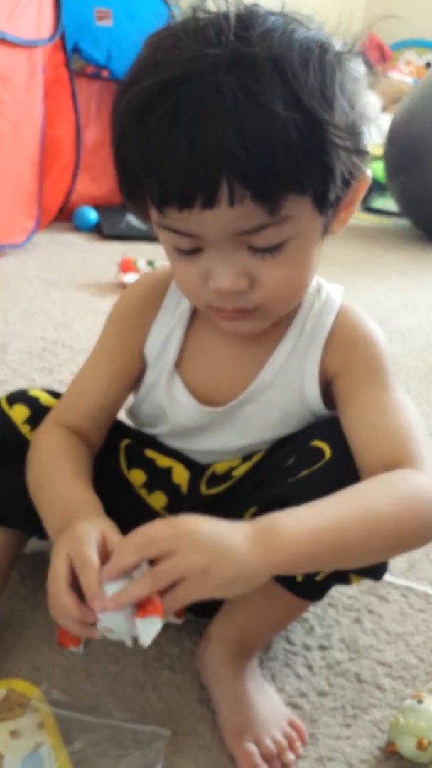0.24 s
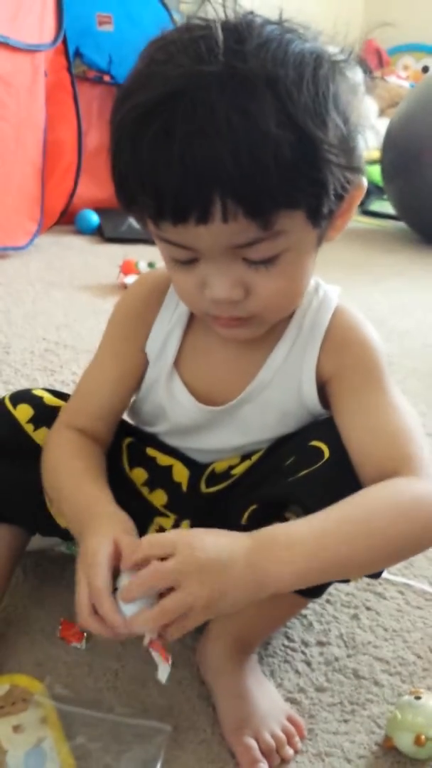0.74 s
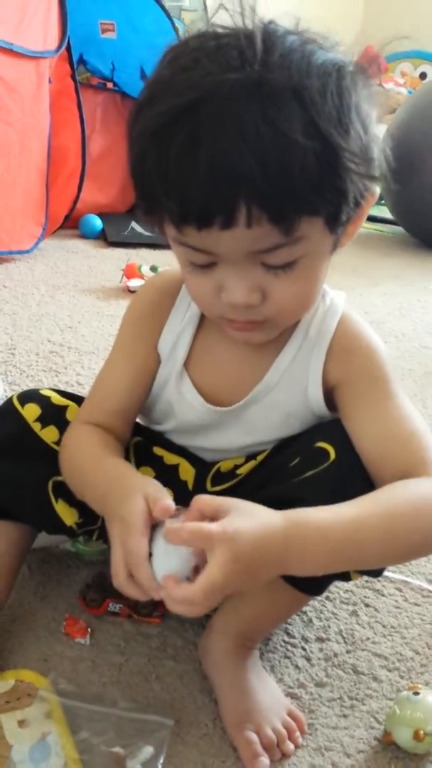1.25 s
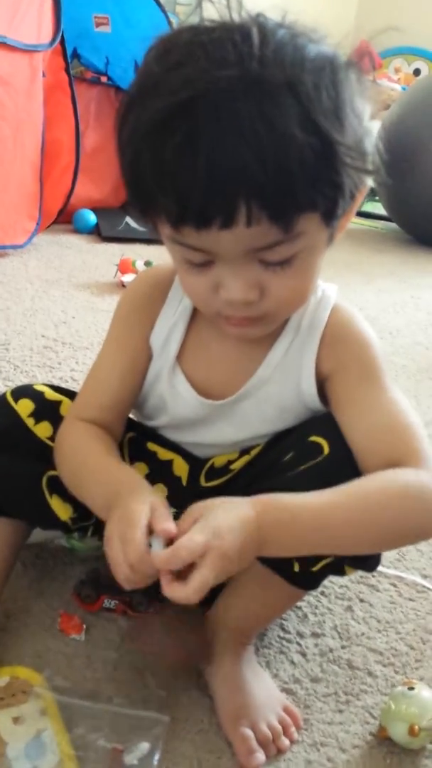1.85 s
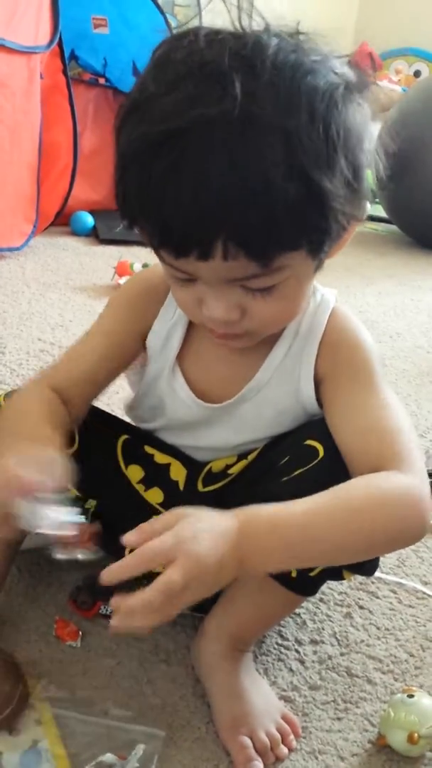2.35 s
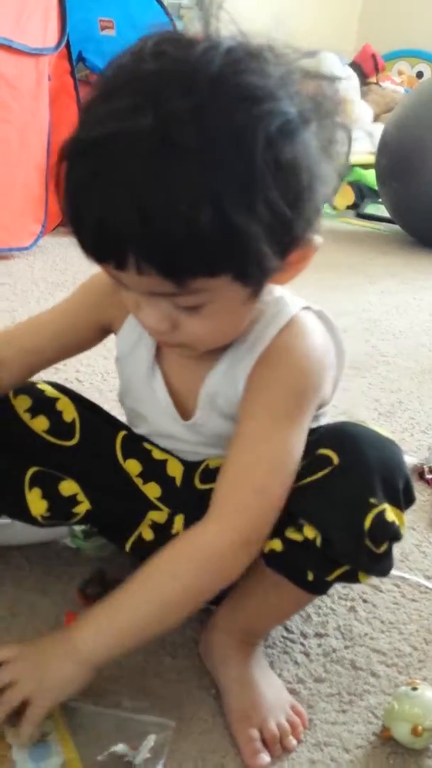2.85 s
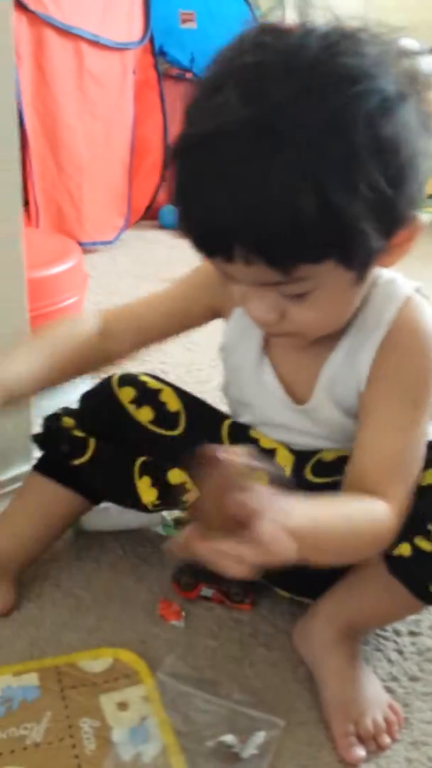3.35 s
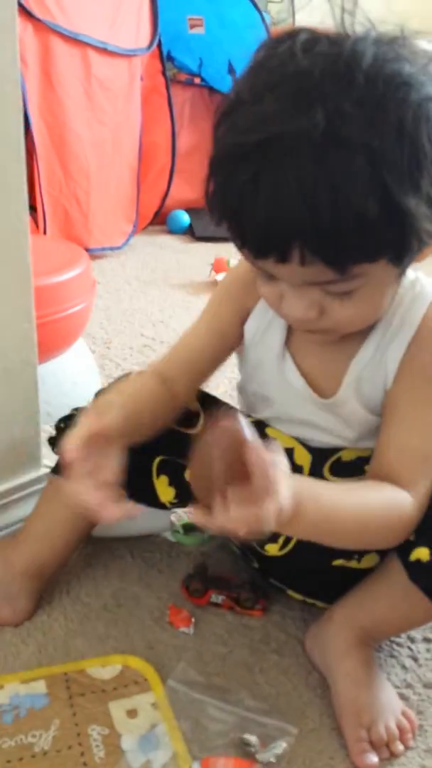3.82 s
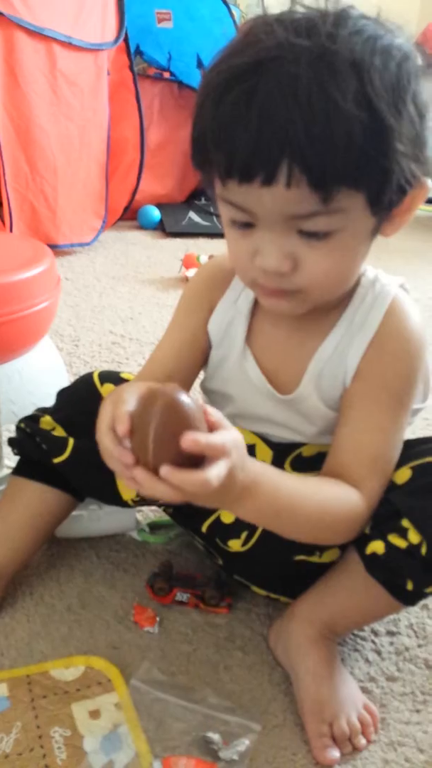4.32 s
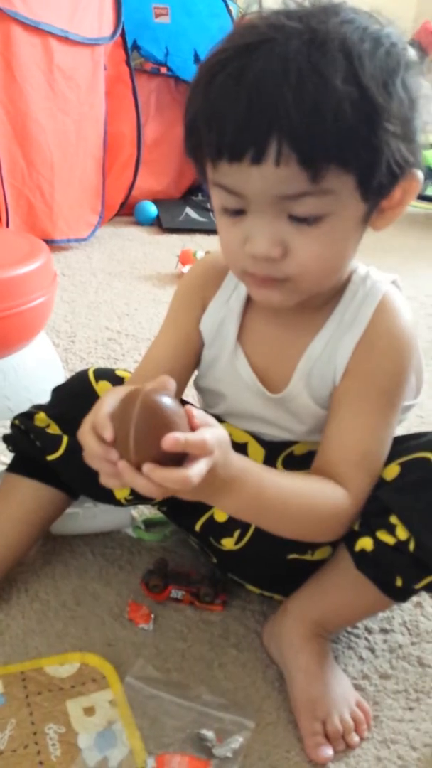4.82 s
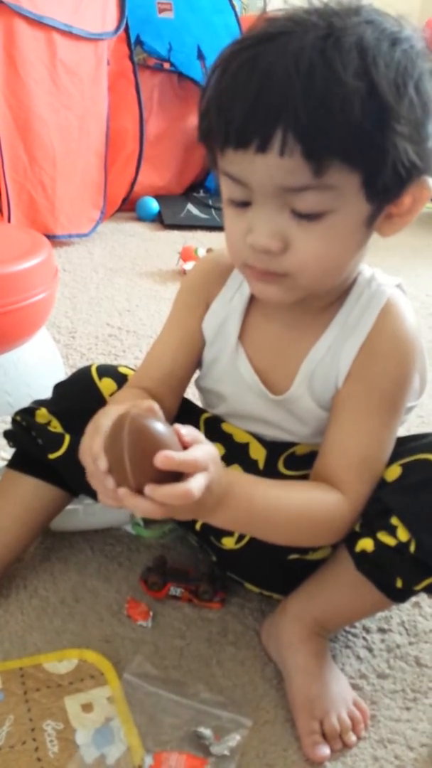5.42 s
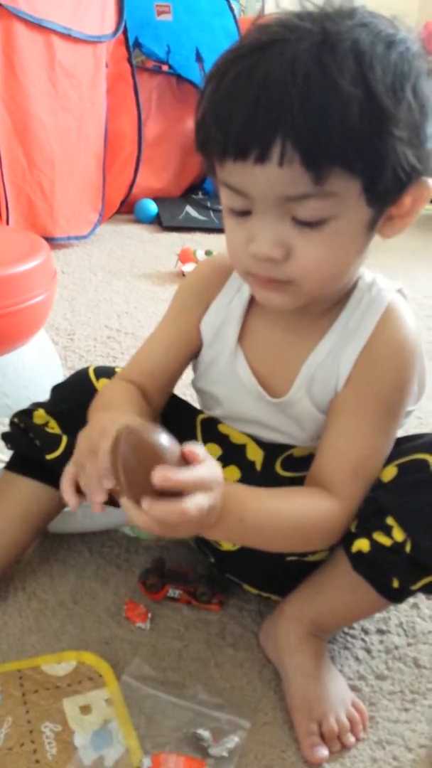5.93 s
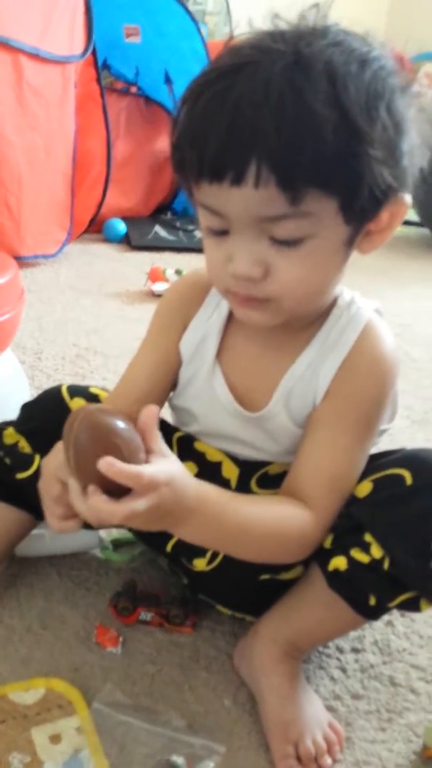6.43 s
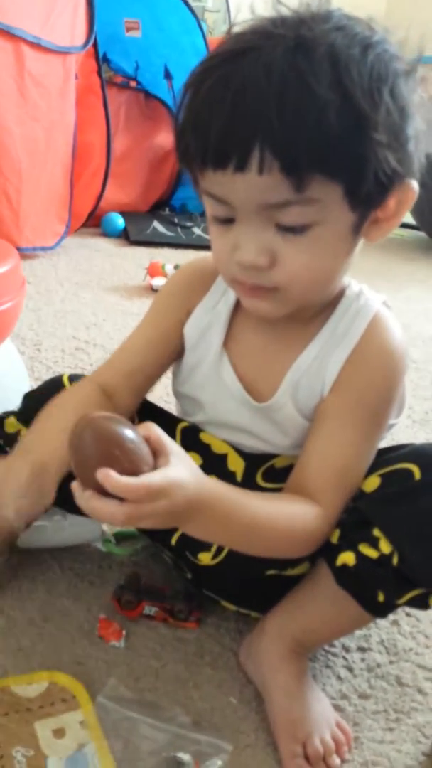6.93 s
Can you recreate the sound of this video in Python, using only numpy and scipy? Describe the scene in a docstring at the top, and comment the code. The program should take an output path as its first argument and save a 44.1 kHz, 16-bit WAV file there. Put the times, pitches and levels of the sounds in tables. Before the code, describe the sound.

Thin foil crinkles and snaps in bright, dense bursts close to the microphone, with soft floor thumps, a near-silent pause, then a few last crackles.

```python
"""In a carpeted room, a thin foil wrapper is crumpled and torn close to a phone.
Its creases snap singly as ticks with dying noise, and rustle in short squeezes as streams of grains;
both drive four bands, of which the top-level ring is the resonance of two microphone ports near 6.7 and 7.5 kHz.
Soft blows excite low modes of the floor, feedback delays form the reverberation,
the phone being handled rumbles as faint low noise and the microphones hiss."""
import sys
import numpy as np
from scipy import signal
from scipy.fft import rfft, irfft, next_fast_len
from scipy.io import wavfile

SR = 44100
rng = np.random.default_rng(int(sys.argv[2]) if len(sys.argv) > 2 else 0)


def unload_audio(sound):
    """Save the sound as a 16-bit wav file, at the path given as the first command line argument."""
    columns = np.transpose(np.atleast_2d(sound))
    # keep every value between -1 and 1, then stretch to whole-number steps
    steps = np.round(np.clip(columns, -1, 1) * 32767)
    wavfile.write(sys.argv[1], SR, steps.astype(np.int16))


N = 316197


def foil(tail_db, tick_db, panel_db, panel_width_hz, patchy_db):
    """Source and filter: snaps (a tick, then an uneven decay) and grainy rustle drive four bands."""
    # creases that snap: t/s, drive level/dB of ring, body, middle and sheen, panel pitch f/Hz
    snaps = [(0.052, -47, -69.5, -78, -65, 1314), (0.154, -46, -62, -71, -61, 730),
             (0.3608, -40, -71, -65, -67, 1290), (0.4538, -39.5, -70, -78, -71, 711),
             (0.699, -34, -80, -71, -61, 960), (0.7757, -29.5, -86, -47, -61, 1470),
             (0.8761, -29.5, -65, -50, -61, 611), (0.9215, -26, -80, -39, -41, 2000),
             (0.9754, -38, -49.5, -50, -49, 850), (0.9874, -24.5, -70, -36.5, -31, 900),
             (1.0413, -31, -49.5, -44, -34, 880), (1.0924, -27, -73, -65, -52, 947),
             (1.1024, -27.5, -76, -62, -58, 891), (1.1939, -20.5, -48, -27.5, -59, 1950),
             (1.281, -20, -74, -41.5, -29, 853), (1.3133, -27, -60.5, -48, -47, 990),
             (1.356, -35, -57, -67.5, -67, 880), (1.4431, -18.5, -62.5, -73.5, -33.5, 921),
             (1.5371, -29, -66.5, -51, -46, 2000), (1.5493, -16, -68.5, -25.5, -53, 2020),
             (1.5827, -24.5, -72, -60.5, -51.5, 2000), (1.614, -22.5, -67, -41.5, -54, 1680),
             (1.6412, -26, -78, -32.5, -46.5, 1730), (1.6715, -11, -48.5, -25.5, -33, 1580),
             (1.6756, -20, -54.5, -26.5, -33.5, 2020), (1.6922, -28, -38, -27, -34, 1690),
             (1.722, -20, -46.5, -23, -37, 1770), (1.8118, -15.5, -45, -58, -29, 1950),
             (1.8882, -13.5, -51, -34.5, -45, 606), (1.9446, -27, -51, -36, -41, 600),
             (1.953, -16, -24.5, -20.5, -53, 610), (1.9893, -22, -54, -30, -45, 1780),
             (2.002, -33, -61, -36, -29.5, 821), (2.0679, -12.5, -37.5, -28, -30, 1414),
             (2.1194, -21, -41.5, -61, -48, 970), (2.131, -24, -56, -55, -44, 1400),
             (2.1788, -32.5, -49, -68, -50, 1890), (2.2611, -24.5, -70.5, -43, -57.5, 748),
             (2.278, -17, -65, -46.5, -41.5, 713), (2.3185, -12, -37, -23, -39.5, 1860),
             (2.3968, -23, -51, -27.5, -41.5, 1800), (2.4176, -24, -42, -34, -17, 1460),
             (2.4261, -16, -77.5, -25.5, -26, 1590), (2.4786, -24, -69, -55.5, -55, 1410),
             (2.4964, -22.5, -54, -36, -51.5, 1150), (2.581, -7.5, -56.5, -16, -42.5, 1680),
             (2.6905, -17, -37, -49, -39, 1160), (2.7306, -33, -44, -51.5, -61, 810),
             (2.8572, -24.5, -42, -25.5, -56, 2030), (2.876, -31, -63, -56, -52, 624),
             (3.2399, -31.5, -52, -50, -83, 740), (3.3317, -35, -61, -55, -53, 980),
             (3.46, -47, -39, -23, -35.5, 1900), (3.5048, -26.5, -57, -54, -38, 1620),
             (3.603, -16.5, -39, -30, -39, 880), (3.608, -8, -36.5, -23, -37, 950),
             (3.62, -27.5, -73, -31, -32, 1840), (3.6466, -21, -60, -52, -43, 947),
             (3.6612, -19.5, -45, -33, -40, 1820), (3.7121, -52, -37.5, -39, -59, 800),
             (3.758, -36, -48, -41, -72, 1420), (3.873, -41.5, -75, -82, -73, 786),
             (3.9382, -24, -45, -37, -56, 790), (4.0335, -51, -63, -64, -67, 778),
             (4.122, -52, -57.5, -61, -81.5, 862), (5.0469, -37.5, -56.5, -50.5, -72.5, 860),
             (5.935, -24, -32.5, -33, -63.5, 1304), (6.182, -49.5, -65, -71, -58, 1910),
             (6.2234, -35, -65, -64, -41, 1310), (6.2357, -31, -56, -41.5, -47, 1790),
             (6.2577, -24.5, -41, -32.5, -56, 1460), (6.2968, -33, -62, -39, -58, 1760),
             (6.3331, -23.5, -50, -37, -47, 1390), (6.3599, -28, -39.5, -29.5, -44, 1060),
             (6.454, -28, -58, -54, -23, 724), (6.4673, -41, -65, -68, -35, 708),
             (6.5294, -28.5, -74, -48, -40, 1980), (6.614, -31.5, -60, -61, -40, 1710),
             (6.6683, -28, -43.5, -39.5, -57, 1430), (6.893, -39, -55.5, -74, -65, 1110),
             (7.042, -12.5, -28.5, -21, -42, 1060), (7.0554, -11.5, -20.5, -12, -32, 1120),
             (7.1024, -46, -25, -52, -49, 650), (7.1538, -26, -26, -30, -40, 895),
             (7.156, -10, -32, -16, -39, 1890)]
    # the foil shifts between the ports: t/s, left minus right of the ring drive/dB
    lean = [(0, 4.5), (1, 4.5), (2, 2.5), (3, 4), (4, 5), (6, 1.5), (7.17, 0)]
    # stereo balance of body, middle, sheen: left minus right/dB
    sides_db = [6.5, 3, -0.5]
    # left-right correlation [-1 to 1] of the noise driving ring, body, middle, sheen
    alike = [0.21, -0.29, -0.28, -0.4]
    snap_t60_s = 0.024

    levels = rustle()
    common = crackle(per_s=440, spread_db=1.5, smooth=1.0)
    t = np.arange(2048) / SR
    wander = signal.lfilter([.3], [1, -.95], rng.standard_normal((len(snaps), len(t))))
    tails = from_db(tail_db + 2.7 * wander)
    tick = from_db(tick_db) * (t == 0)      # the crease lets go in one step
    overtones_hz = rng.uniform(2800, 4400, len(snaps))
    out = np.zeros((2, N))
    for k in range(4):
        own = crackle(per_s=270, spread_db=1.5, smooth=0.11)      # creases of one size sound in one band only
        patches = from_db(patchy_db * drift(5.5))
        grains = rms_one(common + 0.26 * own)
        level = np.pad(levels[k] * patches * grains, (0, len(t)))
        white = pair(rng.standard_normal((2, N + len(t))), alike[k])
        drive = level * white
        for (s, *dbs, panel_hz), tail, overtone_hz in zip(snaps, tails, overtones_hz):
            start = round(s * SR)
            at = slice(start, start + len(t))
            decay = from_db(dbs[k] - 60 * t / snap_t60_s)
            burst = (white[:, at] * tail + tick) * decay
            if k == 1:      # the panel that buckles has a pitch of its own
                burst = burst + from_db(panel_db) * resonance(burst, panel_hz, panel_width_hz)
            if k == 2:      # and a broader overtone somewhere above
                burst = burst + from_db(-1.5) * resonance(burst, overtone_hz, 300)
            drive[:, at] += burst
        balance = sides(in_time(lean)[0]) if k == 0 else sides(sides_db[k - 1])[:, None]
        out += colour(drive[:, :N], size=k) * balance
    return out


def rustle():
    """Exponential envelopes: each squeeze swells and fades straight in dB; powers add to background handling."""
    # squeezes: peak t/s, ring drive level/dB, swell t/s and fade t/s over 20 dB,
    # lower-part level/dB and sheen level/dB relative to the ring
    squeezes = [(0.062, -61.5, 0.044, .15, -6, -9), (0.17, -48, .045, 0.042, -14, -13),
                (0.364, -54.5, 0.19, 0.032, -16.5, -13), (0.594, -60.5, .18, 0.056, -17, -16),
                (0.728, -47, 0.044, 1, -14.5, -16), (0.93, -39.5, 0.026, .2, -22, -15),
                (1.105, -37.5, 0.023, 0.18, -32, -30), (1.292, -44.5, 0.17, 0.11, -12.5, -11.5),
                (1.454, -61, 0.036, .09, -12, 7), (1.684, -17.5, 0.049, 0.096, -15, -16.5),
                (1.821, -32.5, 0.062, 0.14, -9.5, -10), (1.956, -39.5, 0.025, 0.22, -12, -17),
                (2.078, -34.5, 0.021, 0.17, -12, -8.5), (2.275, -43, .025, 0.24, -20, -14),
                (2.327, -31.5, 0.018, 0.055, -9, -3), (2.417, -20.5, 0.044, 0.04, -23, -15),
                (2.46, -40.5, .03, 0.26, -9, -8), (2.654, -25.5, 0.075, .038, -13.5, -24),
                (2.784, -30.5, 0.37, 0.14, -12.5, -16.5), (3.248, -61.5, 0.11, .18, -5, -19),
                (3.342, -43, 0.052, 0.13, -11.5, -11), (3.467, -33.5, 0.045, 0.14, -12.5, -14),
                (3.612, -34, 0.015, 0.12, -7.5, -8.5), (3.759, -39.5, 0.15, 0.056, -13, -13),
                (3.946, -51.5, 0.103, 0.12, -13, -34), (5.049, -66, .025, 0.25, -8.5, -10),
                (5.946, -40, 0.028, 0.12, -8.5, -15.5), (6.176, -64, .035, .4, -11, -11),
                (6.368, -41.5, 0.15, 0.05, -10, -12), (6.465, -51.5, 0.11, 0.21, -12.5, -8),
                (6.538, -55.5, .04, 0.082, -10, -6), (6.622, -54, .08, 0.2, -8.5, -11),
                (6.695, -42, 0.052, .15, -11.5, -14.5), (6.902, -49, 0.12, 1, -15.5, -13.5),
                (7.051, -26.5, 0.0065, 0.092, -8, -21), (7.17, -41, .05, .1, -20, -15)]
    # faint, slowly varying rustle of the foil between squeezes: t/s, ring drive level/dB
    handling = [(0, -65), (0.42, -73.5), (1.0, -61.5), (1.45, -64.5), (2.0, -69), (2.93, -56), (3.2, -70),
                (3.84, -65.5), (4.09, -70), (4.4, -74.5), (4.55, -83.5), (5.0, -83.5), (5.9, -84.5),
                (7.17, -70)]
    # offsets of body and middle within the lower part: level/dB
    lower_colour_db = [-8.5, 1]
    handling_lower_db, handling_sheen_db = -6.5, -7   # relative to the ring, before the offsets

    t = np.arange(0, N + 64, 64) / SR
    s, db, swell, fade, lower, sheen = (c[:, None] for c in np.transpose(squeezes))
    before = (s - t) / np.maximum(swell, .005)
    after = (t - s) / np.maximum(fade, .005)
    shape_db = db - 20 * np.maximum(before, after)
    handling_db = np.interp(t, *np.transpose(handling))
    body, middle = lower_colour_db
    # each band relative to the ring: (in squeezes, in background handling)
    shares = [(0, 0),
              (lower + body, handling_lower_db + body),
              (lower + middle, handling_lower_db + middle),
              (sheen, handling_sheen_db)]
    powers = [np.sum(from_db(shape_db + a) ** 2, axis=0) + from_db(handling_db + b) ** 2 for a, b in shares]
    return [np.interp(np.arange(N) / SR, t, np.sqrt(p)) for p in powers]


def crackle(per_s, spread_db, smooth):
    """Shot noise: clumped small creases of uneven size, each a pulse of a millisecond or two, on a smooth bed."""
    born = rng.random(N) < per_s * from_db(6.0 * drift(25)) / SR
    sizes = born * from_db(spread_db * np.minimum(rng.exponential(1, N), 3))
    decayed = signal.lfilter([1], [1, -.97], sizes)
    swell = signal.lfilter([1], [1, -.9], decayed)      # rounds the onset
    return rms_one(rms_one(swell) + smooth)


def colour(x, size):
    """Linear filtering: size 0 is the port resonance, 1 to 3 are body, middle, sheen; scaled by impulse energy."""
    # resonance of the left and right microphone port: f/Hz, width of one pass f/Hz, level/dB
    ports = [(6663, 1550, 0.5), (7520, 2500, -4)]
    # band edges of body, middle, sheen: lower f/Hz, upper f/Hz
    bands = [(600, 2050), (2000, 5060), (8800, 12600)]
    impulse = np.arange(N) == 0
    x = np.vstack([x, impulse]) + 1e-18
    if size == 0:       # applied twice, for steep flanks
        left, right = (from_db(db) * resonance(resonance(x, hz, width), hz, width) for hz, width, db in ports)
        out = np.array([left[0], right[1], left[2]])      # the left port sets the scale of both
    else:
        out = signal.sosfilt(signal.butter(2, bands[size - 1], "band", fs=SR, output="sos"), x)
    return out[:2] / np.sqrt(np.sum(out[2] ** 2))


def thumps(shake_db):
    """Impact excitation: a knock at contact, and a push that swells into damped modes and a dull noise."""
    # soft blows on the floor: t/s, push level/dB, pitch f/Hz, push 60 dB decay t/s, knock level/dB
    blows = [(0.983, -45, 114, 0.094, -52.5), (1.201, -54.5, 112, 0.59, -65),
             (1.833, -36.5, 304, 0.054, -35), (1.946, -17, 169, 0.04, -34),
             (2.068, -41.5, 229.5, 0.17, -35.5), (2.712, -18, 187, 0.12, -25),
             (2.757, -25.5, 159.6, 0.14, -50), (2.776, -39.5, 136, 0.23, -64), (2.844, -43, 188, 0.11, -62),
             (3.604, -34.5, 294, 0.061, -31), (3.716, -44, 326, 0.099, -46), (3.933, -47, 326, 0.063, -53),
             (5.043, -57.5, 115.6, 0.14, -59.5), (7.057, -20, 192, 0.067, -32),
             (7.103, -18.5, 298, 0.019, -32)]
    floor_hz, floor_db = 115.9, -4   # the floor answers every blow at a pitch of its own, relative to the blow

    out, t = np.zeros(N + 8192), np.arange(8192) / SR
    noise = rng.standard_normal((len(blows), len(t)))
    shakes = rms_one(resonance(resonance(noise, 170, 250), 170, 250))
    knocks = rms_one(resonance(resonance(noise, 730, 940), 730, 940))
    floor_mode = from_db(floor_db) * np.sin(2 * np.pi * floor_hz * t)
    for (s, db, hz, t60, knock_db), shake, knock in zip(blows, shakes, knocks):
        push = (1 - np.exp(-t / 0.0023)) ** 2 * from_db(db - 60 * t / t60)
        own_mode = np.sin(2 * np.pi * hz * t)
        low = push * (own_mode + floor_mode + from_db(shake_db) * shake)
        contact = knock * from_db(knock_db - 60 * t / 0.027)
        out[round(s * SR):][:len(t)] += low + contact
    low_cut = signal.butter(2, 60, "high", fs=SR, output="sos")
    return signal.sosfilt(low_cut, out[:N]) * sides(2.9)[:, None]


def room(x):
    """Reverberation by recirculation: eight feedback delays a side, duller on every round."""
    t60_s, wall_cut_hz = 0.33, 7000   # decay time before the walls' treble loss, and its corner
    size = next_fast_len(N + SR)
    w = 2 * np.pi * np.fft.rfftfreq(size)      # radians a sample
    dull = 1 / (1 + 1j * w * SR / (2 * np.pi * wall_cut_hz))
    lags = rng.uniform(.004, 0.025, 16) * SR      # samples
    loops = [from_db(-60 * lag / SR / t60_s) * dull * np.exp(-1j * w * lag) for lag in lags]
    # g / (1 - g) sums all rounds of a loop; signs alternate between loops
    tail = [sum((-1) ** k * g / (1 - g) for k, g in enumerate(loops[side::2])) for side in (0, 1)]
    return irfft(rfft(x, size) * np.array(tail), size)[:, :N]


def rumble(spectrum, alike):
    """Spectral shaping of partly correlated noise that wavers in level; rms 1 before the stereo balance."""
    hz, db = np.transpose(spectrum)
    grid = np.maximum(np.fft.rfftfreq(N, 1 / SR), 1)
    gain = from_db(np.interp(np.log(grid), np.log(hz), db, left=-60, right=-80))
    noise = irfft(rfft(pair(rng.standard_normal((2, N)), alike)) * gain, N)
    return rms_one(noise * from_db(1.5 * drift(16))) * sides(2.7)[:, None]


def resonance(x, hz, width):
    """Damped oscillator: a two-pole band of the given width in Hz, gain about 1 on top."""
    r = np.exp(-np.pi * width / SR)
    return (1 - r * r) / 2 * signal.lfilter([1, 0, -1], [1, -2 * r * np.cos(2 * np.pi * hz / SR), r * r], x)


def drift(rate):
    """Low-passed random process: slow fluctuation of rms 1, each of its two poles at rate in Hz."""
    r = np.exp(-80 * np.pi * rate / SR)      # one step is 40 samples
    slow = signal.lfilter([1], [1, -2 * r, r * r], rng.standard_normal(N // 40 + 2002))[2000:]
    return np.interp(np.arange(N) / 40, np.arange(len(slow)), rms_one(slow))


def pair(two, alike):
    """Sum and difference of two independent signals give left and right of a chosen correlation."""
    alike = np.clip(alike, -1, 1)
    return np.sqrt((1 + alike) / 2) * two[0] + np.sqrt((1 - alike) / 2) * two[1] * [[1], [-1]]


def sides(pan_db):
    """Interchannel level difference: left and right gains, split evenly in dB."""
    return from_db(np.array([pan_db / 2, -pan_db / 2]))


def from_db(db):
    """Logarithmic level: amplitude gain of a level in dB."""
    return 10 ** (np.asarray(db) / 20)


def rms_one(x):
    """Normalization of mean power: scale to rms 1."""
    return x / np.sqrt(np.mean(x ** 2) + 1e-20)


def in_time(rows):
    """Linear interpolation: table columns as curves, one value a sample."""
    s, *columns = np.transpose(rows)
    return [np.interp(np.arange(N) / SR, s, c) for c in columns]


def scene():
    """Superposition: foil and thumps, direct and reverberant, over the handling rumble."""
    # handling rumble of the phone: t/s, deep level/dB, upper level/dB
    rumble_levels = [(0.0, -65.5, -70.5), (0.6, -65.5, -73), (1.78, -58.5, -63), (2.79, -57.5, -61.5),
                     (3.09, -65.5, -72), (3.53, -58, -60), (4.87, -73, -80), (7.05, -59, -65.5),
                     (7.17, -58, -57)]
    # spectrum of the deep rumble: f/Hz, relative level per Hz/dB
    deep = [(20, -10), (35, -12.5), (60, -7.5), (85, -10.5), (118, -1.5), (160, -14), (220, -20)]
    # spectrum of the upper rumble: f/Hz, relative level per Hz/dB
    upper = [(150, -19), (200, -9), (270, 0), (340, 1), (450, -6.5), (600, -10), (1200, -15.5),
             (2500, -34.5)]

    deep_db, upper_db = in_time(rumble_levels)
    sheet = foil(tail_db=-8, tick_db=7.5, panel_db=10.5, panel_width_hz=190, patchy_db=3.0)
    blows = thumps(shake_db=-4.5)
    handling_rumble = from_db(deep_db) * rumble(deep, .93) + from_db(upper_db) * rumble(upper, .5)
    reverberation = from_db(-18) * room(sheet + from_db(-7.5) * blows)
    return sheet + blows + reverberation + handling_rumble


def record(dry):
    """Transducer noise and band limit: each microphone adds its own white hiss; the top is cut."""
    hiss_db, cutoff_hz = -73.5, 15560   # hiss rms before the cut; edge of the stop band, 60 dB down
    hiss = from_db(hiss_db) * rng.standard_normal((2, N))
    return signal.sosfilt(signal.cheby2(12, 60, cutoff_hz, fs=SR, output="sos"), dry + hiss)


dry = scene()
out = record(dry)
unload_audio(out)
```